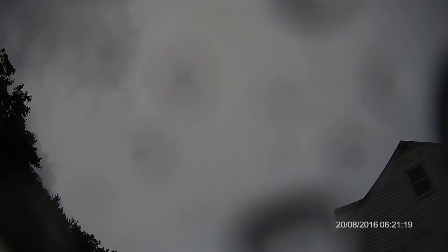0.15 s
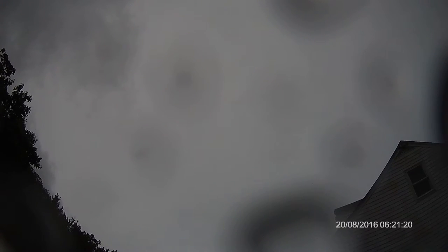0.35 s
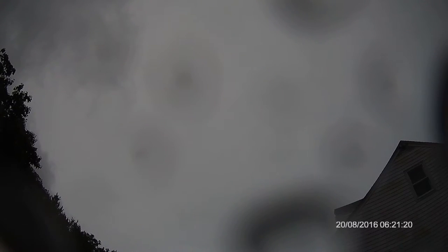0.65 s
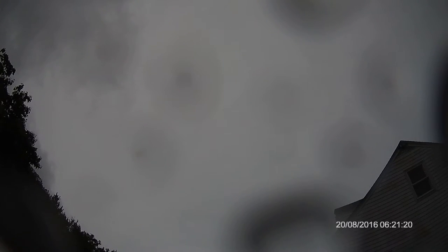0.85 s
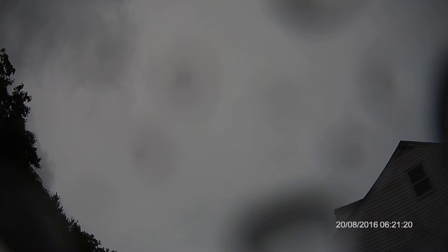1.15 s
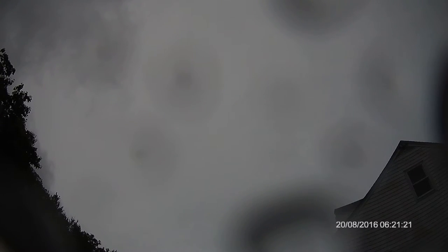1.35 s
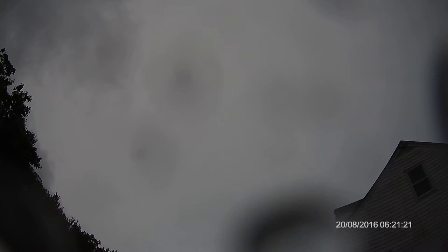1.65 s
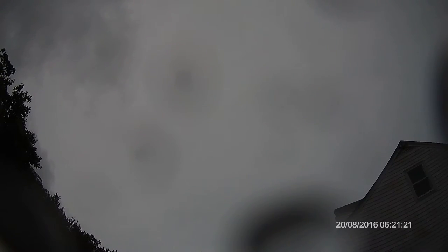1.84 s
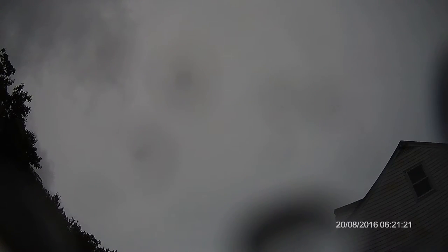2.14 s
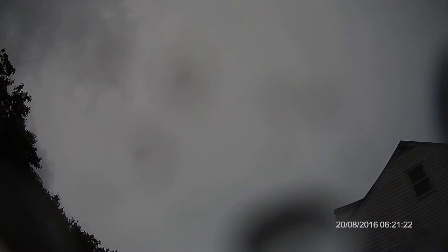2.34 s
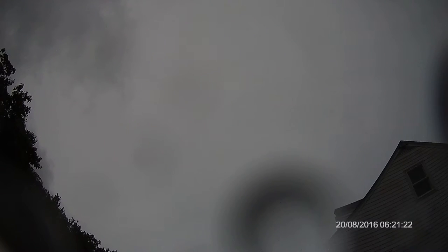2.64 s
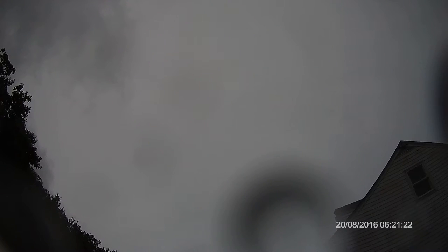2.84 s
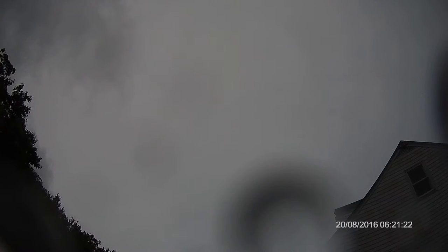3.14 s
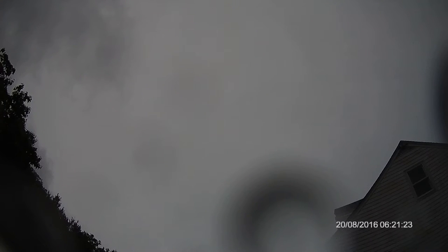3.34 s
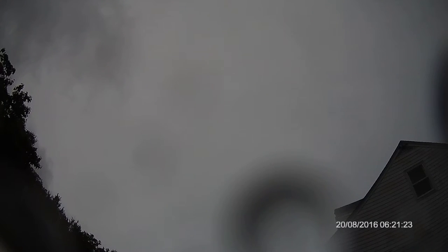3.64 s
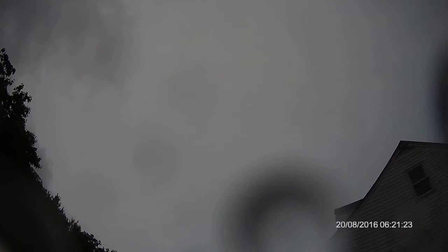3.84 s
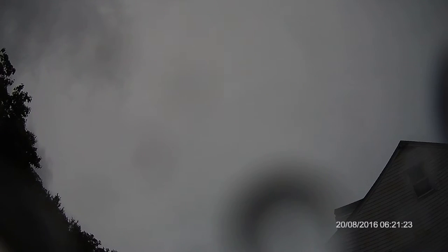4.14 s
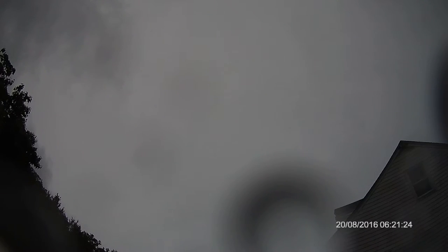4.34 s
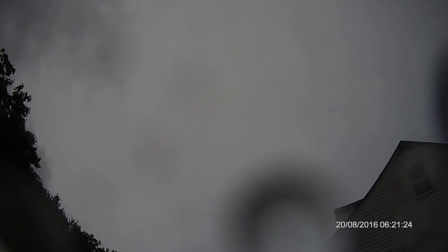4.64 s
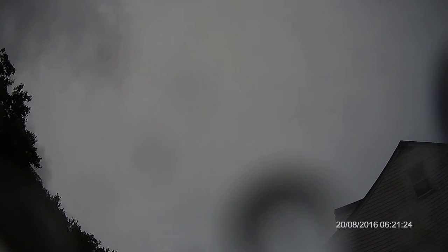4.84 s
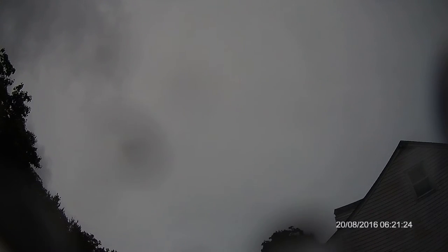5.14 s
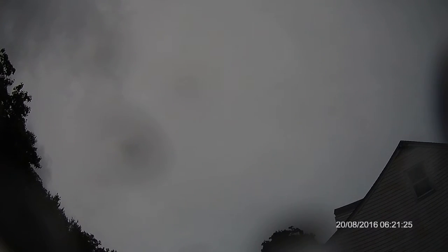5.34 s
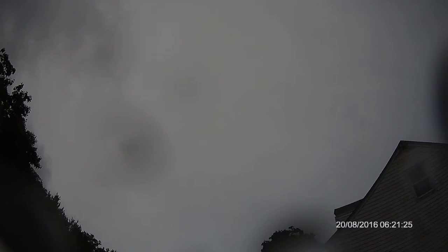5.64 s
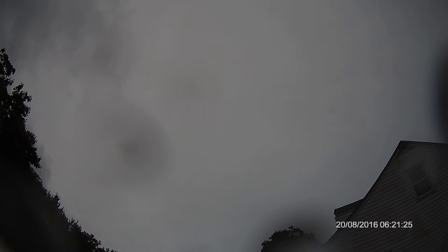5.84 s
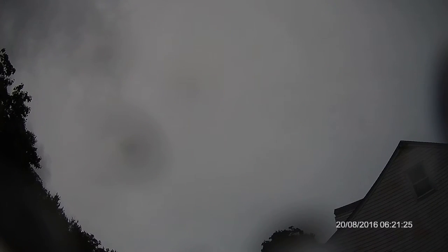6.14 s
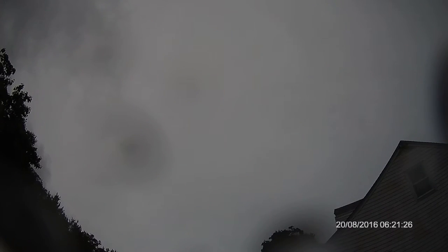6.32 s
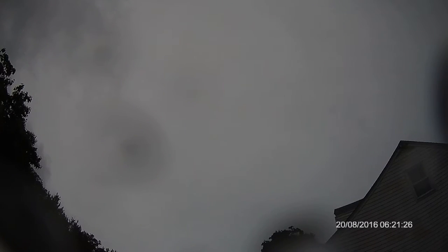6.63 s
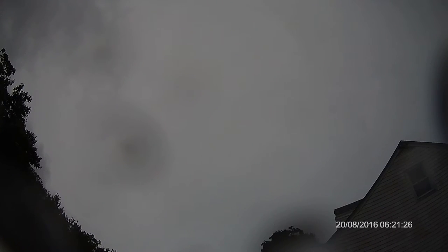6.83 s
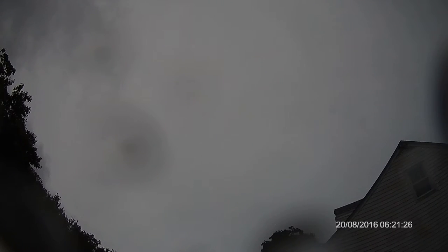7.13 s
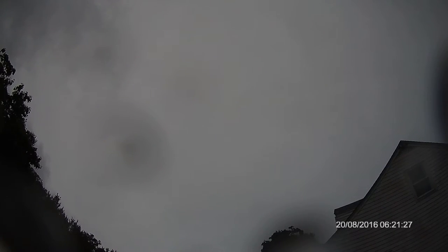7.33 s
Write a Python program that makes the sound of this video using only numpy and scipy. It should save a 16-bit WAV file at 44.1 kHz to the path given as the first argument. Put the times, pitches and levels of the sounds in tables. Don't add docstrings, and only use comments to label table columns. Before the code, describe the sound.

Heavy raindrops thud and tick irregularly on a sealed plastic camera case, over muffled low rain patter, faint electronic hiss and chatter.

```python
import sys
import numpy as np
from scipy import signal
from scipy.io import wavfile
from scipy.ndimage import uniform_filter1d

SR = 44100
rng = np.random.default_rng(int(sys.argv[2]) if len(sys.argv) > 2 else 0)


def unload_wav(signal):
    wavfile.write(
        sys.argv[1],
        SR,
        np.round(np.clip(np.atleast_2d(signal).T, -1, 1) * 32767).astype(np.int16),
    )


def magnitude_from_level(level_db):
    exponent = np.asarray(level_db, float) / 20
    return 10 ** exponent


N = 329868


def evened(x):
    return x / np.sqrt(np.mean(x ** 2) + 1e-20)


def add(mix, start_s, sound):
    part = mix[round(start_s * SR):][:len(sound)]
    part += sound[:len(part)]


def resonate(x, hz, width_hz):
    b, a = signal.iirpeak(hz, hz / width_hz, SR)
    return signal.lfilter(b, a, signal.lfilter(b, a, x))


def coloured(x, spectrum):
    f_hz, level_db = np.transpose(spectrum)
    hz = abs(np.fft.fftfreq(8192, 1 / SR))
    gain_db = np.interp(np.log(hz + 1), np.log(f_hz), level_db, -90, -90)
    log_gain = np.log(magnitude_from_level(gain_db))
    taps = np.fft.ifft(np.exp(np.conj(signal.hilbert(log_gain)))).real[:4096]
    return signal.oaconvolve(x, taps)[:N]


def highpassed(x, order):
    return signal.sosfilt(signal.butter(order, 100, "high", fs=SR, output="sos"), x)


def hiss():
    # (f/Hz, level/dB per Hz)
    spectrum = [(1100, -25), (1900, -6), (3260, -9), (3830, -8.5), (5600, -12.5), (10200, -14.5),
                (14100, -17)]
    # (f/Hz, level/dB per Hz)
    edge = [(15250, -17), (15420, -60)]
    return magnitude_from_level(-57.5) * evened(coloured(rng.standard_normal(N), [*spectrum, *edge]))


def frame_buzz():
    # (f/Hz, width/Hz, level/dB rms)
    bands = [(7960, 90, -76), (9150, 760, -71), (12400, 570, -73)]
    frames_per_s = 59.94
    frame_phase = np.arange(N) / SR * frames_per_s % 1
    readout = np.exp(-frame_phase / 0.16) * rng.standard_normal(N)
    return sum(magnitude_from_level(db) * evened(resonate(readout, hz, width_hz)) for hz, width_hz, db in bands)


def chatter():
    # (f/Hz, width/Hz, level/dB)
    bands = [(4550, 980, -19), (9300, 900, 4), (9870, 880, 6), (10700, 390, 5.5), (12400, 400, -2),
             (13150, 800, -2)]
    single = [.543, 1.04, 1.294, 1.43, 1.591, 1.742, 2.018, 2.186, 2.335, 3.539, 3.698, 3.855, 4.07, 4.332,
              4.547, 4.745, 5.576, 5.778, 5.984, 6.106, 6.331, 6.477, 6.633, 6.797, 7.001, 7.188, 7.34]
    double = [.285, .822, 3.332, 5.02, 5.388]
    # (t/s, length/s, level/dB)
    long = [
        (0.01, 0.078, -61),
        (2.394, 0.12, -67),
        (2.552, 0.054, -62.5),
        (2.628, 0.395, -61.5),
        (3.086, 0.16, -61.5),
    ]
    second_after_s, short_s, short_db = .076, 0.044, -67.5
    short = [*single, *double, *[s + second_after_s for s in double]]
    writing = np.zeros(N)
    for s, length_s, db in [*long, *[(s, short_s, short_db) for s in short]]:
        add(writing, s, magnitude_from_level(db + 4.5) * signal.windows.tukey(round(length_s * SR), .04))
    noise = rng.standard_normal(N)
    tone = sum(magnitude_from_level(db) * evened(resonate(noise, hz, width_hz)) for hz, width_hz, db in bands)
    return writing * evened(tone)


def coil_whine():
    # (t/s, length/s, f/Hz, level/dB)
    s, length_s, hz, db = (2.527, .022, 9150, -52)
    t = np.arange(N) / SR
    on = abs(t - s - length_s / 2) < length_s / 2
    return magnitude_from_level(db) * on * np.sin(2 * np.pi * hz * t)


def electronics():
    return hiss() + frame_buzz() + coil_whine() + chatter()


def patter(per_s, spread_db, patchy_db):
    size_db = spread_db * np.minimum(rng.exponential(1, N), 5)
    size = magnitude_from_level(size_db) * (rng.random(N) < per_s / SR)
    taps = highpassed(size * rng.choice([-1., 1.], N), 2)
    x = evened(taps) + 1.06 * rng.standard_normal(N)
    z = signal.stft(x, nperseg=1024, noverlap=768)[2]
    over_pitch = uniform_filter1d(rng.standard_normal(z.shape), size=5, axis=0)
    patches = evened(uniform_filter1d(over_pitch, size=8, axis=1))
    return signal.istft(z * magnitude_from_level(patchy_db * patches), nperseg=1024, noverlap=768)[1][:N]


def rain():
    # (t/s, level/dB)
    swells = [(0.0, -32.5), (0.55, -30), (0.75, -31), (0.785, -28), (1.2, -33), (1.77, -33), (2.8, -32.5),
              (3.23, -34.5), (3.56, -32), (3.77, -33.5), (4.27, -31.5), (4.56, -34), (4.8, -33), (5.5, -34),
              (5.81, -32.5), (6.4, -36.5), (6.9, -33.5), (7.48, -35.5)]
    # (f/Hz, level/dB per Hz)
    mount_spectrum = [(20, -54), (40, -14.5), (92, -20), (122, -6.5), (141, -2.5), (178, -8), (250, -0.5),
                      (320, -4), (430, -12.5), (520, -12), (640, -17), (750, -9), (840, -16), (885, -27)]
    # (f/Hz, level/dB per Hz)
    lid_spectrum = [(530, -28), (900, -18.5), (1010, -10), (1090, -3.5), (1260, -1), (1390, -3.5),
                    (1580, -6), (1760, -9), (1880, -18), (2010, -37), (2300, -27), (2990, -51),
                    (5060, -120)]
    usual_db, lid_usual_db, lid_follows = -33, -43, 0.79
    mount_db = np.interp(np.arange(N) / SR, *np.transpose(swells))
    lid_db = lid_usual_db + lid_follows * (mount_db - usual_db)
    mount = evened(coloured(patter(500, 3.37, 2.33), mount_spectrum)) * magnitude_from_level(mount_db)
    lid = evened(coloured(patter(900, 2.7, 3.3), lid_spectrum)) * magnitude_from_level(lid_db)
    return mount + lid


def thuds():
    # (t/s, knock level/dB, knock f/Hz, sway level/dB)
    hits = [(0.04, -22, 217, -42), (0.513, -31, 270, -44), (0.56, -20, 259, -41), (0.672, -12, 256, -27),
            (0.812, -7, 224, -18), (0.941, -14, 236, -20.5), (1.115, -25, 247, -48),
            (1.251, -14.5, 247, -30), (1.584, -34, 225, -50), (1.882, -14.5, 257, -47),
            (1.98, -35, 270, -53), (2.052, -11, 255, -46), (2.194, -17.5, 275, -47), (2.375, -18, 238, -44),
            (2.496, -12, 255, -26), (2.892, -19, 320, -22.5), (3.553, -22, 234, -24),
            (4.064, -12.5, 264, -44), (4.141, -7, 279, -23), (4.441, -15, 267, -32),
            (4.667, -17.5, 284, -25), (4.849, -17, 231, -45), (5.095, -13.5, 290, -25),
            (5.268, -20, 222, -42), (5.365, -6, 252, -24), (5.517, -35, 231, -43), (5.671, -6, 260, -17),
            (6.476, -16.5, 273, -44), (6.665, -18.5, 312, -37), (7.227, -21, 218, -39)]
    out, t = np.zeros(N), np.arange(7000) / SR
    knock_t60_s, sway_t60_s, sway_hz = 0.049, 0.19, 140
    for s, knock_db, knock_hz, sway_db in hits:
        knock = magnitude_from_level(knock_db - 4.0 - 60 * t / knock_t60_s) * (1 - np.exp(-t / 0.00092))
        add(out, s, knock * np.sin(2 * np.pi * knock_hz * t))
        sway = magnitude_from_level(sway_db - 60 * t / sway_t60_s) * (1 - np.exp(-t / 0.012))
        add(out, s, sway * np.sin(2 * np.pi * sway_hz * t))
    return highpassed(out, 3)


def drops():
    # (t/s, lid ring level/dB, upper lid f/Hz, splash level/dB)
    on_pool = [(.7665, -40, 1490, -46), (.9998, -30.5, 1430, -38.5), (1.2554, -31.5, 1550, -42),
               (2.2643, -31.5, 1495, -42), (3.1565, -36.5, 1440, -55), (4.4885, -32.5, 1510, -34),
               (5.5568, -35.5, 1405, -47), (6.7337, -20.5, 1530, -46), (6.8592, -27.5, 1490, -35.5),
               (6.861, -25, 1497, -60), (7.2276, -22, 1423, -45)]
    # (t/s, lid ring level/dB, upper lid f/Hz, splash level/dB, side wall ring level/dB)
    on_window = [
        (2.5509, -14.5, 1645, -20.5, -27),
        (4.0939, -11, 1540, -21, -22),
        (4.2218, 2.5, 1512, -19, -19),
        (4.3572, 1.5, 1482, -24, -24),
    ]
    # (t/s, lid ring level/dB, wall ring level/dB, dull splash level/dB, sharp splash level/dB)
    on_wall = [(.6343, -17.5, -7.5, -22, -32), (.7325, -52, -39, -48, -40.5), (0.882, -44, -30.5, -37, -53),
               (3.414, -53, -37.5, -39, -38), (4.7315, -44, -31.5, -36, -39), (5.1966, -55, -41, -53, -48),
               (6.0987, -49, -32, -35.5, -38), (6.6928, -35, -28.5, -35, -42), (7.095, -58, -49, -46, -63),
               (7.4032, -39, -47, -35, -44), (7.4086, -34, -50, -41, -40)]
    # (t/s, then level/dB)
    on_hollow = [(0.3862, -19.5, -27.5, -44, -28), (.8308, -11.5, -19.5, -20.5, -21.5),
                 (2.728, -26.5, -35, -50, -39), (4.014, -14.5, -19.5, -30, -24),
                 (5.26, -13.5, -17.5, -21.5, -24), (7.3957, -20, -29.5, -30, -28),
                 (7.3996, -24.5, -33, -36, -33)]
    # (t/s, then level/dB)
    on_dry_lid = [(1.4773, -10, -18, -20, -8.5), (1.2964, -32, -45, -41, -35),
                  (1.913, -33, -31, -31.5, -23), (2.417, -26, -19.5, -24.5, -14.5),
                  (2.4321, -29, -40, -34, -26), (3.6624, -14, -9.5, -23, -15), (4.6226, -23, -21, -21, -21),
                  (4.8992, -28, -36, -36, -25), (5.0524, -15, -13, -16, -10.5)]
    # (t/s, then level/dB)
    on_rim = [(0.4549, -37, -37, -28.5, -36), (.5787, -26, -28, -36, -34.5), (1.2626, -28, -27, -32, -34.5),
              (2.1519, -27.5, -23.5, -25.5, -33.5), (2.2352, -29.5, -32, -33, -41),
              (2.9007, -26.5, -26, -27.5, -29.5), (4.4055, -45, -26, -33, -36),
              (7.3952, -23, -23, -25, -43)]
    # (upper lid/dB and knock/dB over lid ring, window/dB over wall ring,
    # fine/dB and finest/dB over sharp splash)
    offsets = [
        (2.5, -12.5, 7, -6, -4),
        (-2.5, -18, 2, -12, -18),
        (0, -9, -21.5, -6, -7),
        (-5, -2, -9, -9, -5),
        (-6, -5, -12, -13, -8),
        (-5, 0, -13, -2.5, 3.5),
    ]
    # (upper lid f/Hz, dull splash f/Hz, sharp splash f/Hz)
    pitches = [
        (1480, 3200, 5200),
        (1507, 3900, 4540),
        (1540, 3150, 4900),
        (1520, 3300, 4350),
        (1510, 2950, 4800),
        (1490, 3050, 4700),
    ]
    pool_wall_db, pool_sharp_db, window_dull_db = -33, -8.5, -3
    pool = [(s, lid, lid + pool_wall_db, dull, dull + pool_sharp_db, hz) for s, lid, hz, dull in on_pool]
    glass = [(s, lid, wall, sharp + window_dull_db, sharp, hz) for s, lid, hz, sharp, wall in on_window]
    tables = [pool, glass, on_wall, on_hollow, on_dry_lid, on_rim]
    rows = []
    for table, offset_db, (lid_hz, dull_hz, sharp_hz) in zip(tables, offsets, pitches):
        upper, knock, window, fine, finest = offset_db
        for s, lid, wall, dull, sharp, *own_hz in table:
            ring_db = (lid, lid + upper, wall, wall + window, lid + knock)
            high_hz = (*own_hz, lid_hz)[0]
            splash = (dull, dull_hz, sharp, sharp_hz, sharp + fine, sharp + finest)
            rows.append((s, ring_db, high_hz, splash))
    return sorted(rows)


def rings():
    # (f/Hz, level/dB, t60/s)
    shell = [
        [(1281, 0, .036), (1130, -9, .026), (1040, -20, .04)],
        [(1500, 0, .033), (1680, -9, .018), (1800, -19, .03)],
        [(2020, 0, .017), (1870, -12, .012), (2160, -19, .028)],
        [(2435, 0, .028), (2300, -6, .008), (3480, -18, .018)],
        [(520, 0, .022), (750, -3, .03), (930, -5, .01)],
    ]
    out, t = np.zeros(N), np.arange(2600) / SR
    hits = drops()
    chance = rng.standard_normal((len(hits), 5, 3))
    for (s, levels_db, high_hz, splash), shift in zip(hits, chance):
        blunt_db = np.clip(max(levels_db) - splash[2], 0, 35)
        rise_s = .0004 + .00005 * blunt_db
        rise = np.sin(np.pi / 2 * np.minimum(t / rise_s, 1)) ** 2
        free = min(0.45 + 0.024 * blunt_db, 1)
        sense = 1 if levels_db[4] - levels_db[0] > -4 else -1
        for k, (level_db, modes) in enumerate(zip(levels_db, shell)):
            spot = high_hz / modes[0][0] if k == 1 else 1
            for j, (hz, db, t60_s) in enumerate(modes):
                mode_hz = hz * spot * (1 + shift[k, j] / 200)
                decay = magnitude_from_level(level_db + db + 7.0 - 60 * t / (t60_s * free))
                add(out, s, sense ** (k + j) * decay * rise * np.sin(2 * np.pi * mode_hz * t))
    return out


def ticks():
    # (lowest f/Hz, highest f/Hz, t60/s)
    splash_zones = [
        (2790, 4120, 0.011),
        (3890, 6500, 0.0067),
        (7580, 8600, 0.0059),
        (11100, 16900, 0.0039),
    ]
    fine_hz, finest_hz = 7360, 9980
    out, t = np.zeros(N), np.arange(700) / SR
    rise = 1 - np.exp(-t / 0.00014)
    hits = drops()
    chance = rng.random((len(hits), 4, 2, 3))
    for (s, _, _, splash), draw in zip(hits, chance):
        dull_db, dull_hz, sharp_db, sharp_hz, *fine_db = splash
        levels_db = [dull_db, sharp_db, *fine_db]
        mains_hz = [dull_hz, sharp_hz, fine_hz, finest_hz]
        for level_db, main_hz, zone, (place, turn) in zip(levels_db, mains_hz, splash_zones, draw):
            low_hz, high_hz, t60_s = zone
            strong_hz = main_hz * (1 + .05 * (place[2] - .5))
            weak_hz = low_hz + (high_hz - low_hz) * (np.arange(2) + place[:2]) / 2
            hz = np.r_[strong_hz, weak_hz]
            modes = magnitude_from_level([0, -9, -10]) @ np.sin(2 * np.pi * (hz[:, None] * t + turn[:, None]))
            add(out, s, magnitude_from_level(level_db + 3.0 - 60 * t / t60_s) * rise * modes)
    return out


def scene():
    return (electronics() + rain() + thuds() + rings() + ticks())[None]


def top_cut(x):
    return signal.sosfilt(signal.butter(12, 16470, fs=SR, output="sos"), x)


def record(dry):
    # (f/Hz, level/dB)
    treble_edge = [(1, 0), (15350, 0), (15600, -12), (16500, -20), (16800, -80)]
    recovery_db_per_s, threshold_db, attack_s, duck_ratio = 200.0, -7.0, .0008, 0.78
    peak_db = 20 * np.log10(abs(dry[0]) + 1e-6)
    fall_db = np.arange(N) * recovery_db_per_s / SR
    held_db = np.maximum.accumulate(peak_db + fall_db) - fall_db
    over_db = np.maximum(held_db - threshold_db, 0)
    keep = np.exp(-1 / (attack_s * SR))
    ducked = dry[0] / magnitude_from_level(duck_ratio * signal.lfilter([1 - keep], [1, -keep], over_db))
    mix = coloured(np.clip(ducked, -1, 1), treble_edge)[None]
    return top_cut(mix)


dry = scene()
out = record(dry)
unload_wav(out)
```